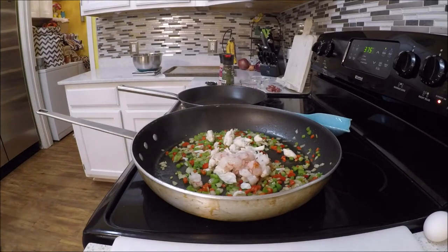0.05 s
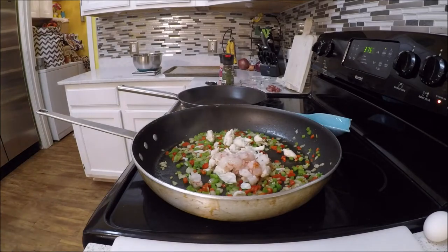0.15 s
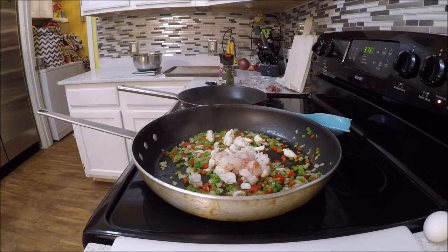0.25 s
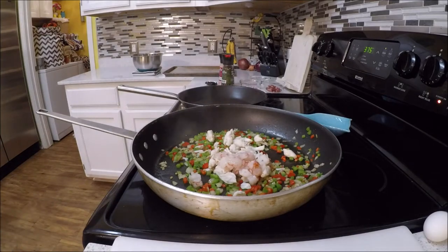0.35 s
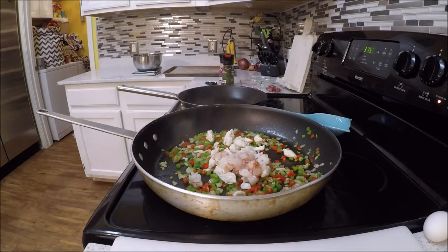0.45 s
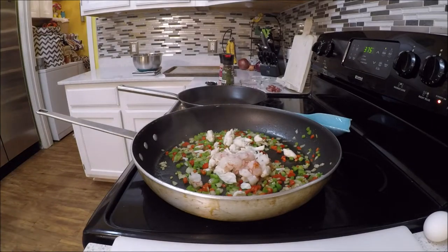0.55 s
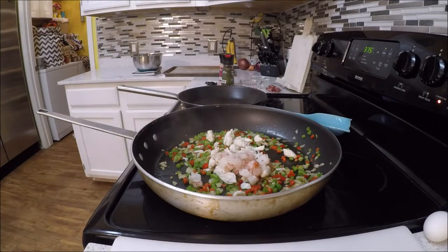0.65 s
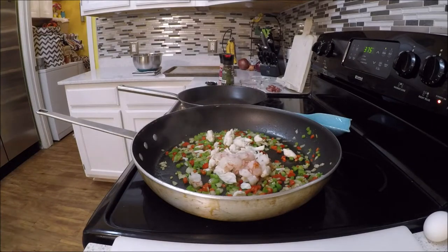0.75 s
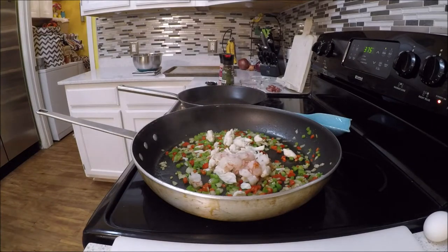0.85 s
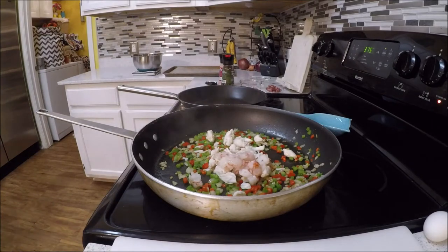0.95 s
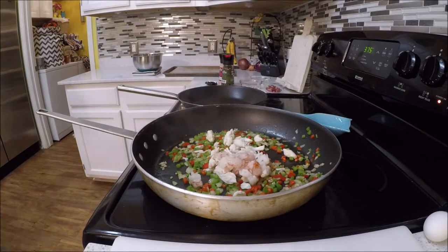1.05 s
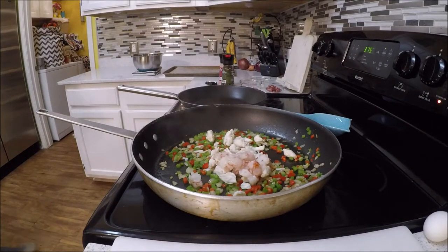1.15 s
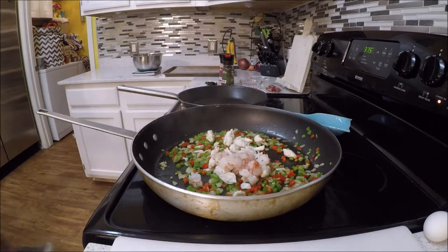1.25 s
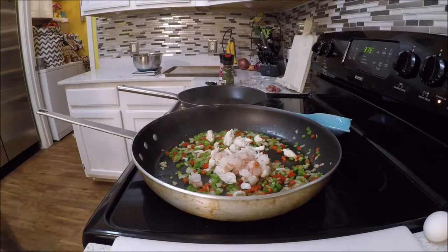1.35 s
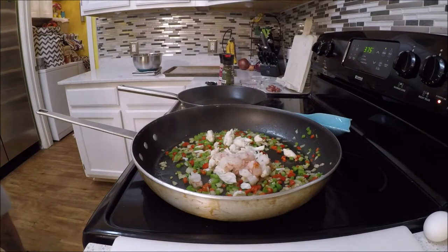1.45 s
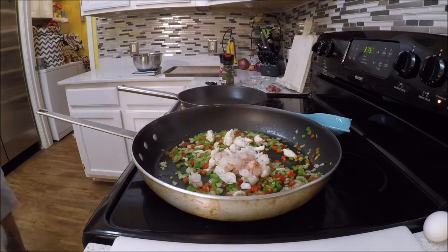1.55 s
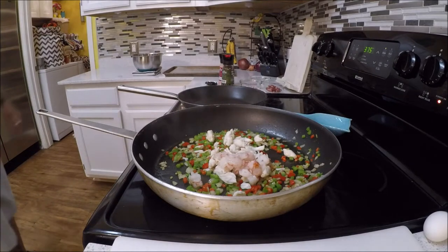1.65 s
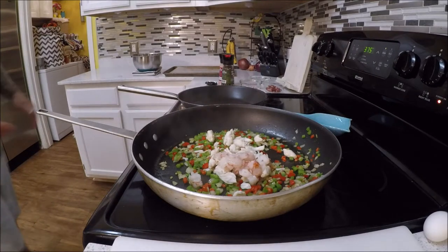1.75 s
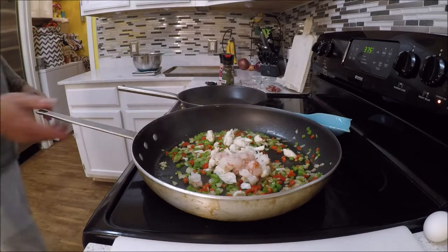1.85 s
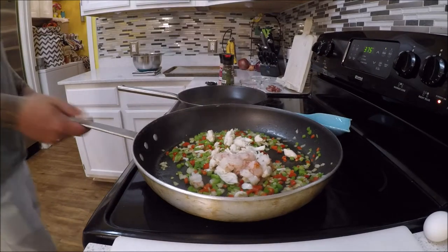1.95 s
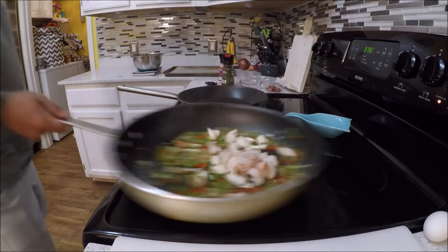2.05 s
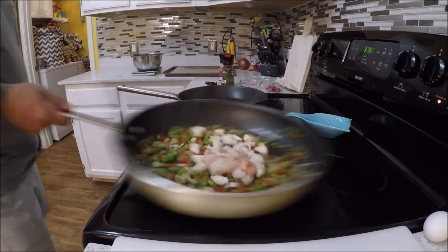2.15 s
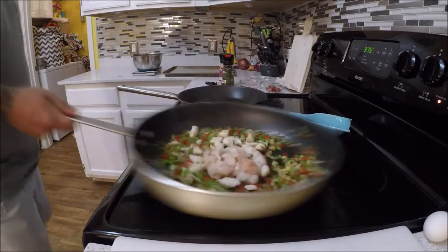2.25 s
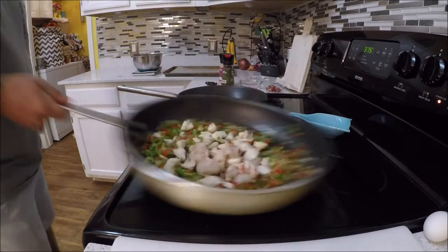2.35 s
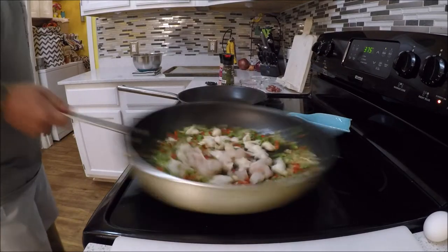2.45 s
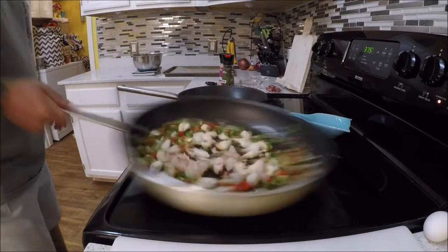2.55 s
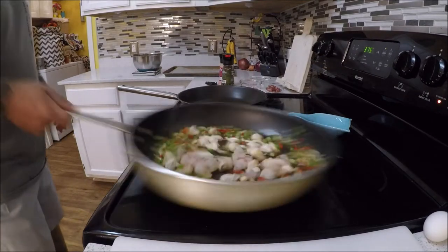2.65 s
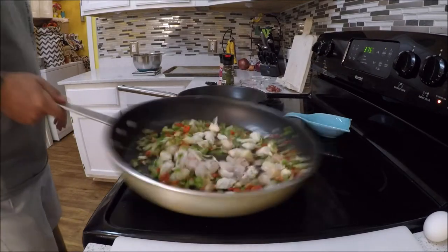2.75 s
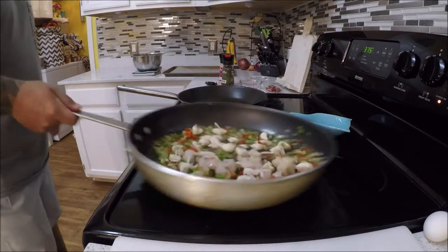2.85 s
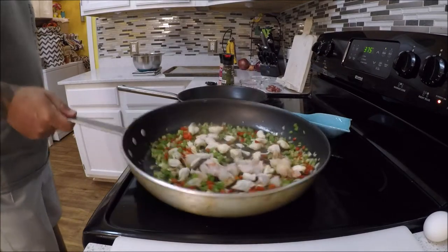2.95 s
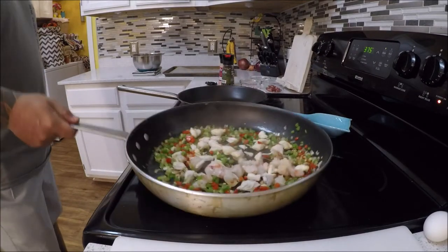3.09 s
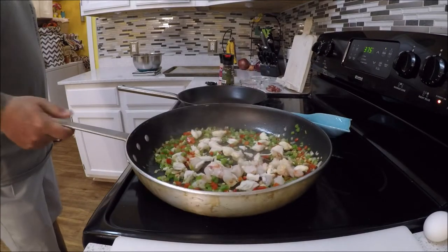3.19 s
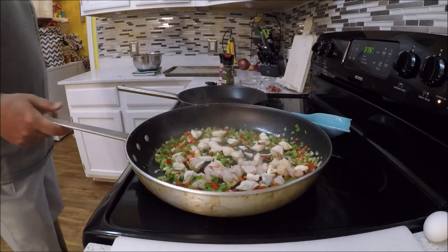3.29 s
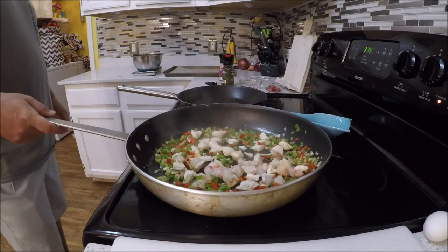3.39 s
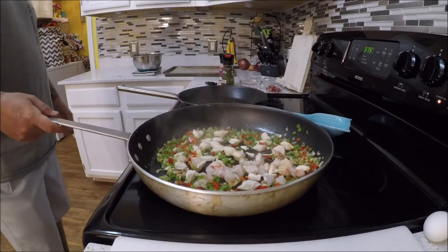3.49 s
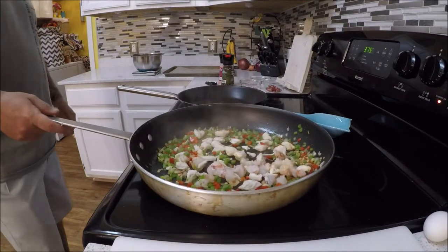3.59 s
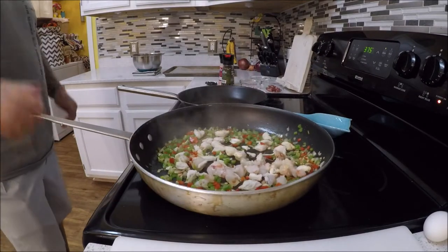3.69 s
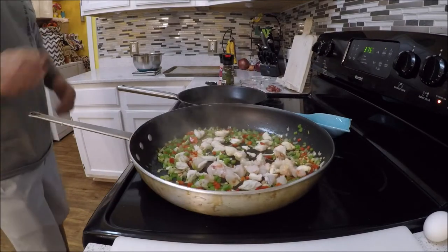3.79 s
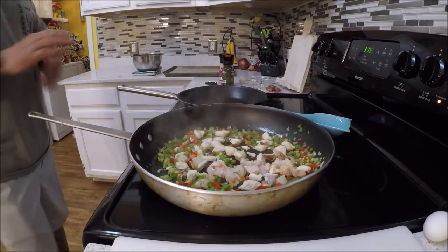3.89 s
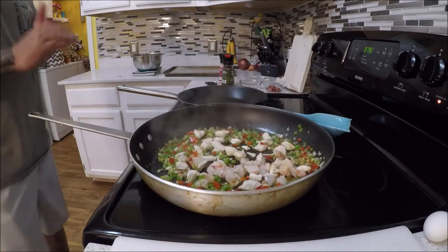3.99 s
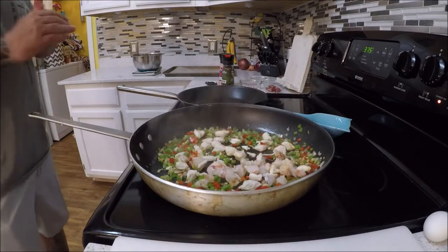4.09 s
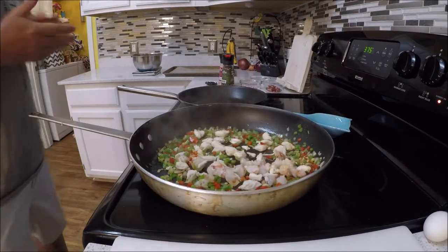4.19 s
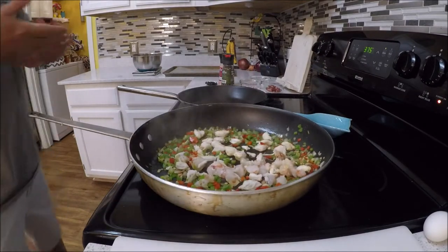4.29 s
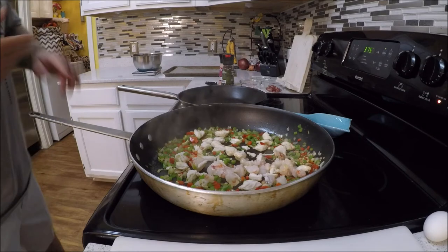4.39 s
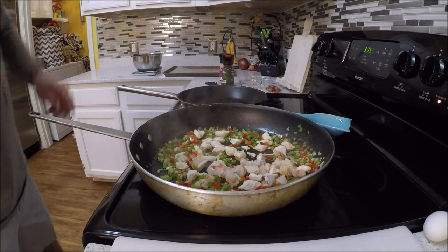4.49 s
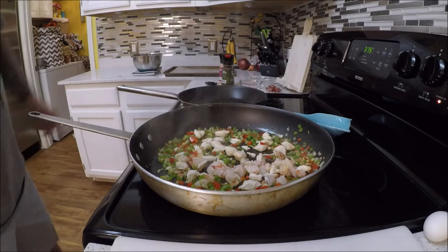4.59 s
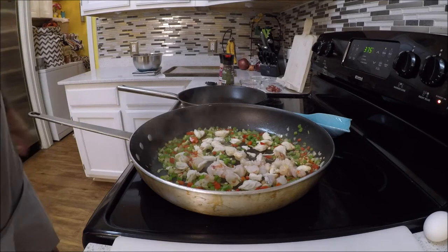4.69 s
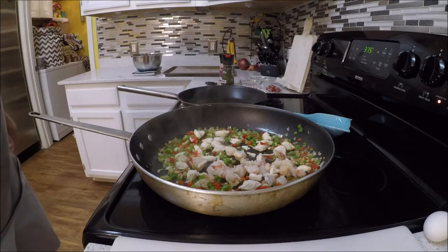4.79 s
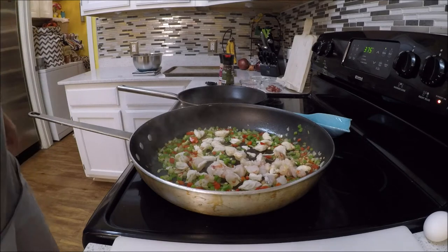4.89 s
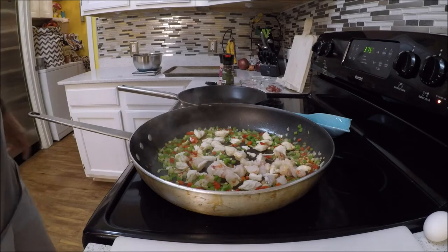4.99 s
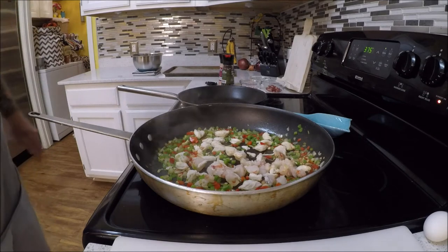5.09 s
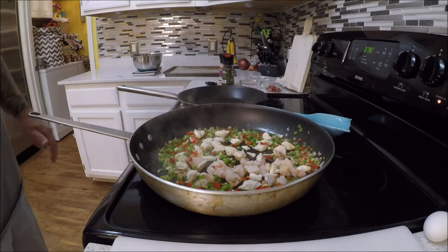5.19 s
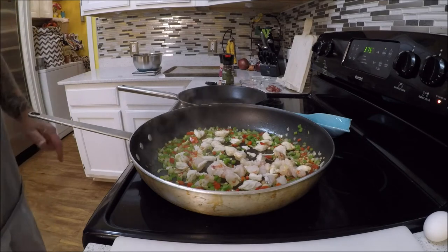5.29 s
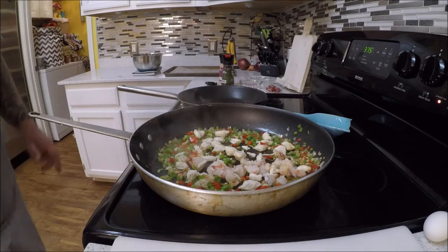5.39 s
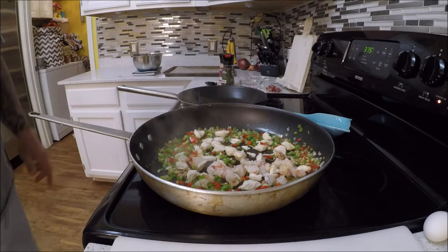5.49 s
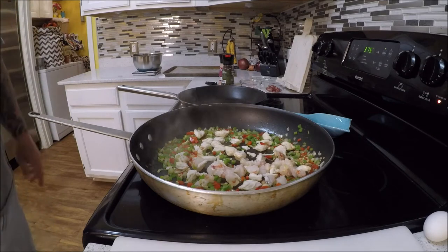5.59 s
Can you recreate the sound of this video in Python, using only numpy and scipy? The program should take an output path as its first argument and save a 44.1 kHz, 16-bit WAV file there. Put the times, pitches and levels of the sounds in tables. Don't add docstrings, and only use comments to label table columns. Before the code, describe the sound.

Food sizzles steadily in a skillet; a utensil clatters across the kitchen, then the pan is shaken, scraping and knocking, and slammed down on the stove.

```python
import sys
import numpy as np
from scipy import signal
from scipy.fft import rfft, irfft
from scipy.io import wavfile
from scipy.ndimage import uniform_filter1d

SR = 44100
rng = np.random.default_rng(int(sys.argv[2]) if len(sys.argv) > 2 else 0)


def how_loud(loudness_db):
    steps = np.asarray(loudness_db, float) / 20
    return 10 ** steps


def generate_wav(signal):
    frames = np.transpose(np.atleast_2d(signal))
    scaled = np.clip(frames, -1, 1) * 32767
    pcm = np.round(scaled).astype(np.int16)
    wavfile.write(sys.argv[1], SR, pcm)


N = 248724
BLOW_S = 3.1205

# (time [s], level [dB])
SHUDDER_CURVE = [
    (0, -72),
    (1.8, -76),
    (2.05, -67),
    (2.75, -61),
    (3.0, -53),
    (3.12, -40),
    (4.0, -42.5),
    (4.5, -48.5),
    (5.64, -66),
]


def evened(x):
    return x / np.sqrt(np.mean(x ** 2) + 1e-20)


def read(points, hz):
    f, value = np.transpose(points)
    return np.interp(np.log(hz + 1), np.log(f + 1), value)


def envelope(rows, column=1):
    rows = np.array(rows)
    return how_loud(np.interp(np.arange(N) / SR, rows[:, 0], rows[:, column], -150, -150))


def swells(rows):
    t = np.arange(N) / SR
    return sum(how_loud(db) ** 2 * np.exp(-0.5 * ((t - s) / half) ** 2) for s, db, half in rows)


def dying(s, db, rise_s, db_per_s):
    u = np.maximum(np.arange(N) / SR - s, 0)
    fall_db = db_per_s * np.maximum(u - rise_s, 0)
    return np.minimum(u / rise_s, 1) ** 2 * how_loud(db - fall_db) ** 2


def coloured(x, points):
    log_gain = np.log(how_loud(read(points, abs(np.fft.fftfreq(4096, 1 / SR)))))
    taps = np.fft.ifft(np.exp(np.conj(signal.hilbert(log_gain)))).real[:2048]
    return signal.oaconvolve(x, taps[None], axes=1)[:, :N]


def ringing(x, modes):
    return sum(how_loud(db) * signal.lfilter(*signal.iirpeak(hz, hz / width, SR), x) for hz, width, db in modes)


def pops(per_s, spread_db):
    size = how_loud(spread_db * np.minimum(rng.exponential(1, (2, N)), 4))
    size *= rng.choice([-1, 1], (2, N))
    return evened(size * (rng.random((2, N)) < per_s / SR))


def sizzle():
    # (time [s], level [dB])
    fry_curve = [
        (0, -29.5),
        (1.95, -29.5),
        (2.2, -24),
        (2.7, -22.5),
        (3.0, -26.5),
        (3.3, -27.5),
        (4.0, -30),
        (4.7, -31),
        (5.64, -30),
    ]
    # (frequency [Hz], density [dB per Hz])
    fry_colour = [(260, -53.5), (450, -14.5), (514, -15), (569, -17.5), (699, -14), (1150, -15.5),
                  (1980, -9.5), (2160, -10), (2430, -7.5), (5140, -3.5), (5950, 1), (6990, -3),
                  (9520, -18.5), (12400, -22.5), (15000, -23)]
    # (time [s], peak [dB])
    fat_spits = [(0.9144, -21), (0.9464, -26), (1.022, -13), (1.0554, -21), (1.0914, -22), (1.3244, -23),
                 (4.8414, -26), (4.9422, -20), (5.1894, -29), (5.3194, -23), (5.437, -22), (5.4437, -16)]
    flurry = how_loud(0.64 * evened(uniform_filter1d(rng.standard_normal(N), 1500)))
    drive = pops(5000, 1.1) + 0.76 * rng.standard_normal((2, N))
    drive *= flurry * envelope(fry_curve)
    drive *= how_loud(-3 * swells([(0.44, 0, 0.11)]))
    for s, db in fat_spits:
        drive[:, round(s * SR)] += 3.3 * how_loud(db)
    unit = np.std(coloured(rng.standard_normal((1, N)), fry_colour))
    fry = 0.75 * coloured(drive, fry_colour) / unit
    wet_hz, wet_width_hz, wet_share, tossed_s = 2800, 1700, 0.24, 2.9
    wetness = wet_share * np.clip(tossed_s - np.arange(N) / SR, 0, 1)
    return fry + wetness * ringing(fry, [(wet_hz, wet_width_hz, 0)])


def fan():
    # (frequency [Hz], density [dB per Hz])
    air_colour = [(40, -16), (80, -13), (120, -0.5), (150, -7), (200, -8.5), (260, -10), (320, -12),
                  (470, -17), (900, -21), (1500, -30), (2500, -66)]
    # (frequency [Hz], level [dB])
    fan_tones = [(120, -56), (172.3, -48), (204.6, -41), (236.9, -52), (395, -51), (412, -52)]
    drift = rng.standard_normal((2, len(fan_tones), N))
    drift = evened(uniform_filter1d(uniform_filter1d(drift, 4000), 4000))
    tones = np.zeros(N)
    for (hz, db), pitch, loudness in zip(fan_tones, *drift):
        phase = 2 * np.pi * np.cumsum(hz * (1 + 0.002 * pitch)) / SR
        tones += how_loud(db + 1.2 * loudness) * np.sqrt(2) * np.sin(phase)
    return tones + how_loud(-43.5) * evened(coloured(rng.standard_normal((2, N)), air_colour))


def shudder():
    # (time [s], level [dB], half width [s])
    booms = [
        (2.75, -47, 0.13),
        (3.19, -25, 0.02),
        (3.35, -34, .06),
        (3.61, -41.5, .07),
        (3.99, -38, 0.024),
    ]
    noise = rng.standard_normal((2, N))
    deep = evened(signal.sosfilt(signal.butter(2, [32, 70], "band", fs=SR, output="sos"), noise))
    ring_hz = 79.3
    ring = evened(ringing(ringing(noise, [(ring_hz, 16, 0)]), [(ring_hz, 30, 0)]))
    broad = how_loud(np.array([[-2], [2]])) * deep * envelope(SHUDDER_CURVE)
    swell = np.sqrt(swells(booms) + (how_loud(-4.5) * envelope(SHUDDER_CURVE)) ** 2)
    return broad + how_loud(np.array([[-12], [5]])) * ring * swell


def clatter():
    # (time [s], level [dB])
    landings = [
        (0.311, -17.5),
        (0.32, -13),
        (.337, -27),
        (.375, -24),
        (.41, -24),
        (.445, -26),
    ]
    # (time [s], level [dB])
    hard_knocks = [
        (.324, -17),
        (.328, -15),
        (.338, -18),
        (.3605, -16),
    ]
    # (frequency [Hz], width [Hz], level [dB])
    utensil_modes = [(293, 26, 1.5), (800, 21, -11), (844, 38, 2), (1100, 27, 5), (1170, 45, -13),
                     (1953, 11, 8), (2270, 43, -21), (2575, 53, 0.5), (3425, 15, 5), (4000, 26, -20),
                     (6000, 80, -5), (5990, 69, -2)]
    # (frequency [Hz], level [dB])
    rattle_colour = [(71, -51.5), (120, -2.5), (296, -3), (614, -7), (807, -5.5), (1280, -3.5),
                     (1920, -4.5), (4900, -18.5), (6110, -13), (7000, -47), (9100, -53), (15400, -120)]
    rise_s = 0.0017
    power = sum(dying(s, db, rise_s, 115) for s, db in landings)
    power = power + dying(landings[0][0], -37.5, rise_s, 23)
    drive = (pops(3000, 2.0) + 0.71 * rng.standard_normal((2, N))) * np.sqrt(power)
    for s, db in hard_knocks:
        drive[:, round(s * SR)] += 3.1 * how_loud(db)
    noise = rng.standard_normal((2, N))
    rings = ringing(drive, utensil_modes) / np.std(ringing(noise, utensil_modes))
    rings = signal.sosfilt(signal.butter(6, 6800, fs=SR, output="sos"), rings)
    rattle = coloured(drive, rattle_colour) / np.std(coloured(noise, rattle_colour))
    return 0.32 * rings + 0.61 * rattle


def room(x):
    # (frequency [Hz], t60 [s])
    kitchen_t60 = [(150, 0.34), (1000, 0.4), (4000, 0.12), (12000, 0.067)]
    hz, t, z = signal.stft(rng.standard_normal((2, SR // 2)), SR, nperseg=256)
    decay = how_loud(-60 * t / read(kitchen_t60, hz)[:, None])
    tail = signal.istft(z * decay, SR, nperseg=256)[1]
    return signal.fftconvolve(x, tail / np.linalg.norm(tail[0]), axes=1)[:, :N]


def glints():
    # (time [s], level [dB], half width [s], pitch [Hz])
    utensil_glints = [
        (0.317, -17, 0.002, 833),
        (.326, -21.5, 0.0031, 5990),
        (.35, -29, 0.012, 834),
        (.37, -30, 0.022, 5990),
        (.415, -25.5, 0.016, 832),
        (.43, -33, .035, 3490),
        (.37, -27, 0.024, 1953),
        (.45, -31, 0.011, 1900),
        (.52, -38, .04, 1140),
        (3.25, -31.5, 0.051, 1130),
    ]
    # (time [s], level [dB], half width [s], pitch [Hz])
    pan_glints = [(2.19, -33, .01, 3780), (2.27, -25.5, 0.015, 1195), (2.383, -24, .01, 1347),
                  (2.47, -18.5, 0.0058, 5840), (2.49, -24.5, 0.022, 1280), (2.51, -28.5, 0.028, 770),
                  (2.6, -28, 0.018, 560), (2.662, -26, 0.0057, 2100), (2.685, -24.5, .018, 1276),
                  (2.722, -28.5, .016, 770), (2.8, -28.5, 0.011, 1505), (2.795, -29, .01, 2520),
                  (3.0, -32.5, .008, 866), (3.08, -29, .008, 648), (4.18, -52, .015, 654)]
    noise = rng.standard_normal((2, N // 2))
    out = np.zeros((2, N))
    for s, db, half, hz in utensil_glints + pan_glints:
        mode = [(hz, 40 + 0.039 * hz, 0)]
        tone = np.tile(evened(ringing(ringing(noise, mode), mode)), 2)
        out += np.sqrt(swells([(s, db, half)])) * tone
    return out


def shake():
    # (frequency [Hz], width [Hz], level [dB])
    stove_modes = [(146, 28, 2), (221, 23, -0.5), (277, 33, -6), (324, 100, -1), (402.5, 15, -2),
                   (453, 31, -4), (560, 17, -14)]
    # (frequency [Hz], width [Hz], level [dB])
    pan_modes = [(770, 49, -0.5), (946, 98, 4), (1280, 280, 4.5), (1523, 72, -3), (2100, 44, -8),
                 (2760, 28, 1)]
    # (frequency [Hz], density [dB per Hz])
    slide_colour = [(880, -28), (1500, -9), (2250, -10.5), (3930, -3), (4540, -8), (5890, -1),
                    (7640, -15.5), (8830, -29), (11300, -40), (13200, -30), (15000, -30)]
    # (time [s], pan scrape [dB], sliding food [dB], half width [s])
    strokes = [(1.487, -40.5, -60, 0.032), (1.673, -61, -30, 0.0043), (1.722, -48, -30, 0.0067),
               (2.065, -38, -23, 0.019), (2.096, -28.5, -36, .012), (2.187, -20.5, -22.5, 0.014),
               (2.272, -27, -21.5, 0.013), (2.385, -18.5, -20.5, 0.0095), (2.476, -23.5, -23.5, 0.01),
               (2.59, -21, -18, .013), (2.682, -22.5, -20.5, 0.015), (2.79, -23.5, -25.5, 0.016),
               (3.006, -29.5, -50, .006)]
    # (time [s], level [dB], half width [s])
    rumbles = [
        (1.731, -39.5, 0.019),
        (1.96, -42, 0.01),
        (2.016, -22.5, 0.0032),
        (2.096, -21.5, .024),
        (2.19, -19.5, 0.011),
        (2.227, -23.5, 0.024),
        (2.289, -21, 0.0091),
        (2.427, -19, 0.028),
        (2.758, -30, .008),
        (2.831, -24, 0.02),
    ]
    # (time [s], level below full [dB])
    arm_effort = [
        (1.9, -22.5),
        (2.2, -19),
        (2.284, -4.5),
        (2.424, -12.5),
        (2.624, -0.5),
        (2.746, -5),
        (2.894, -1.5),
        (3.04, -12.5),
        (3.12, -1),
    ]
    # (level at full effort [dB], share of effort followed [1], level after the blow [dB])
    layers = [
        (-24, 0.84, -19.5),
        (-28, 1.2, -21),
        (-33, 0.52, -44),
    ]
    stalls = [
        2.213,
        2.413,
    ]
    grit = [pops(4000, 1.9) + 0.83 * rng.standard_normal((2, N)) for layer in range(3)]
    stove = evened(ringing(grit[0], stove_modes))
    pan = evened(ringing(grit[1], pan_modes))
    food = evened(coloured(grit[2], slide_colour))
    scrapes = [(s, db, half) for s, db, _, half in strokes]
    slides = [(s - 0.0028, db, half) for s, _, db, half in strokes]
    force = []
    for bursts, (full_db, share, after_db) in zip([rumbles, scrapes, slides], layers):
        steady = how_loud(full_db) * envelope(arm_effort) ** share
        settling = dying(BLOW_S - 0.01, after_db, 0.048, 90)
        force.append(np.sqrt(swells(bursts) + steady ** 2 + settling))
    stall = how_loud(-6.5 * swells([(s, 0, 0.0065) for s in stalls]))
    return (stove * force[0] + pan * force[1] + food * force[2]) * stall


def bumps():
    # (time [s], peak [dB], pitch [Hz], t60 [s])
    glass_bumps = [(1.719, -25.5, 247, 0.1), (1.929, -21, 157, 0.016), (1.951, -17.5, 182, 0.046),
                   (2.01, -17.5, 417, 0.027), (2.09, -9.5, 256, 0.0053), (2.219, -11, 420, 0.035),
                   (2.421, -8.5, 410, 0.017), (2.994, -14, 158, 0.041), (3.0684, -7, 338, 0.013),
                   (3.0902, -12, 197, 0.028), (3.1036, -9.5, 160, 0.039), (3.1107, -12, 170, 0.014),
                   (3.1174, -2, 215, 0.023)]
    wobble_times = [
        3.1448,
        3.1737,
        3.222,
        3.25,
        3.295,
    ]
    # (frequency [Hz], level [dB], t60 [s])
    stove_ring = [(146, -24.5, 1), (215, -13, 0.5), (456, -38, 0.5), (970, -30, 0.38)]
    # (time [s], peak [dB])
    rim_ticks = [
        (2.095, -8.5),
        (2.222, -11),
        (2.375, -20),
        (2.423, -8),
        (2.573, -13),
        (2.662, -15),
        (2.995, -25),
    ]
    # (frequency [Hz], level [dB])
    tick_colour = [(300, -5), (800, 1), (1400, -2), (2200, -6), (3500, -14), (9000, -44)]
    # (frequency [Hz], level [dB])
    crack_colour = [(200, 0), (700, 4.5), (2000, 4.5), (3500, 1.5), (5800, -6), (7500, -14), (10000, -22),
                    (14500, -4), (16500, -38)]
    out, t = np.zeros((2, N)), np.arange(SR // 2) / SR
    u = t - 0.0053
    wobbles = [(s, -11 - 96 * (s - wobble_times[0]), 214, 0.077) for s in wobble_times]
    for s, db, hz, t60 in glass_bumps + wobbles:
        shape = np.where(u < 0, np.exp(-(u / 0.0019) ** 2), how_loud(-60 * u / t60))
        out[:, round(s * SR):][:, :len(t)] -= 1.01 * how_loud(db) * shape * np.cos(2 * np.pi * hz * u)

    blow = round(BLOW_S * SR)
    ring = sum(how_loud(db - 60 * t / t60) * np.sin(2 * np.pi * hz * t) for hz, db, t60 in stove_ring)
    out[:, blow:][:, :len(t)] += ring * (1 - np.exp(-t / 0.029))
    ping = 0.7 * np.sin(2 * np.pi * 5800 * t) * (t / 0.00038) ** 2 * np.exp(2 - 2 * t / 0.00041)
    out[:, round((BLOW_S - 0.0006) * SR):][:, :len(t)] += ping

    click, ticks = np.zeros((2, 2, N))
    click[:, blow] = 1
    for s, db in rim_ticks:
        ticks[:, round(s * SR)] = -how_loud(db)
    splinter = rng.standard_normal((2, len(t))) * 0.3 * np.exp(-t / 0.0021)
    crack = click.copy()
    crack[:, blow + 1:][:, :len(t)] = 0.59 * splinter[0] + 0.5 * splinter
    crack = coloured(crack, crack_colour)
    out += how_loud(0.5) * crack / abs(crack).max()
    return out + coloured(ticks, tick_colour) / coloured(click, tick_colour).max()


def ports(pair, same, tilt_db):
    # (frequency [Hz], left lead [rad])
    left_lead = [(100, -0.27), (300, -0.39), (700, 0.62), (1500, -0.15), (3000, 0.11), (6000, -0.45),
                 (15000, 0)]
    hz, (a, b) = np.fft.rfftfreq(N, 1 / SR), rfft(pair)
    likeness, half = np.clip(read(same, hz), 0, 1), how_loud(tilt_db / 2)
    right = likeness * a * np.exp(-1j * read(left_lead, hz)) + np.sqrt(1 - likeness ** 2) * b
    return irfft(np.array([a * half, right / half]), N)


def frayed(top):
    hz, t, z = signal.stft(top, SR, nperseg=2048)
    patches = np.repeat(rng.standard_normal((len(t), 65)), 16, axis=1)[:, :len(hz)].T
    edge_hz = 15150 + 300 * evened(uniform_filter1d(rng.standard_normal(len(t)), size=2))
    loss_db = -9.0 * np.clip(patches - 0.9, 0, 3) * (hz > 9000)[:, None]
    kept = how_loud(loss_db) * (hz[:, None] < edge_hz)
    return signal.istft(z * kept, SR, nperseg=2048)[1][:, :N]


def scene():
    # (frequency [Hz], likeness [1])
    same_steady = [(60, 11), (99, 2.5), (160, 0.77), (270, 3.43), (450, 0.4), (740, 0.14), (1220, 0.28),
                   (2010, 0.87), (3330, 1.1), (5500, 0.9), (9080, 0.03), (15000, 0.6)]
    # (frequency [Hz], likeness [1])
    same_moving = [(60, 0.2), (110, 1), (200, 0.95), (380, 1), (700, 0.89), (1290, 0.1), (2380, 0.47),
                   (4400, 0.64), (8120, 0.22), (15000, 0.58)]
    # (frequency [Hz], left over right [dB])
    lean = [(60, 1), (130, -0.5), (290, -1), (640, -4), (1410, -2.5), (3100, -1.5), (6820, 0.5), (15000, 1)]
    t = np.arange(N) / SR - BLOW_S
    duck = how_loud(-9.5 * np.clip(t / 0.02, 0, 1) * np.clip(1 - t / 0.93, 0, 1))
    steady = ports(sizzle() + fan(), same_steady, -0.47)
    hits, lean_db = bumps(), read(lean, np.fft.rfftfreq(N, 1 / SR))
    moving = ports(shake() + clatter() + glints(), same_moving, lean_db)
    wash = (steady + moving + how_loud(-15.5) * room(hits + moving)) * duck
    air = hits + signal.sosfilt(signal.cheby2(10, 50, 15900, fs=SR, output="sos"), wash)
    wind_cut_hz = 119
    cut = signal.sosfiltfilt(signal.cheby2(8, 32, wind_cut_hz, "high", fs=SR, output="sos"), air)
    opened = np.minimum(envelope(SHUDDER_CURVE) / how_loud(-45), 1) ** 1.06
    return cut + (air - cut) * opened + shudder()


def roll_off(x):
    return signal.sosfilt(signal.butter(12, 16330, fs=SR, output="sos"), x)


def record(dry):
    # (time [s], recovery [s], level change [dB])
    top_shifts = [
        (.315, 0.065, 2.5),
        (3.122, 0.084, -24),
    ]
    t = np.arange(N) / SR
    body = signal.sosfiltfilt(signal.butter(6, 8300, fs=SR, output="sos"), dry)
    thin_db = sum(db * (t > s) * np.exp(-((t - s) / back) ** 4) for s, back, db in top_shifts)
    flutter_db = 0.75 * evened(uniform_filter1d(uniform_filter1d(rng.standard_normal(N), 1200), 1200))
    top = frayed(dry - body) * how_loud(uniform_filter1d(thin_db, 60) + flutter_db)
    kept = np.clip(body + top, -1, 1)
    kept = kept * ((t < 4.5765) | (t > 4.6097))
    kept = signal.sosfiltfilt(signal.cheby2(10, 50, 16250, fs=SR, output="sos"), kept)
    return roll_off(kept)


dry = scene()
out = record(dry)
generate_wav(out)
```